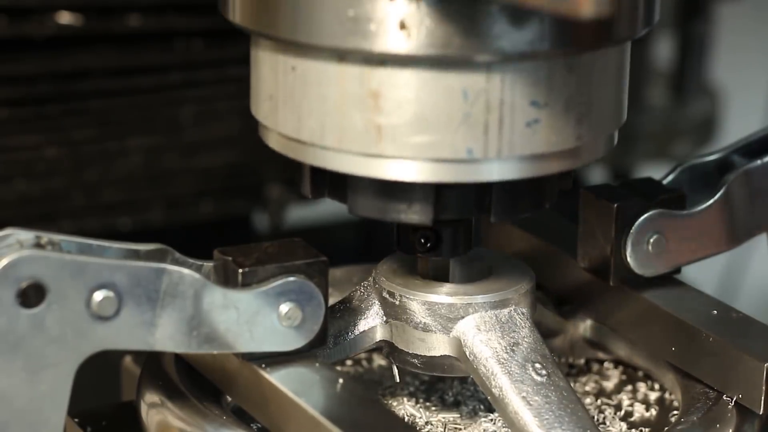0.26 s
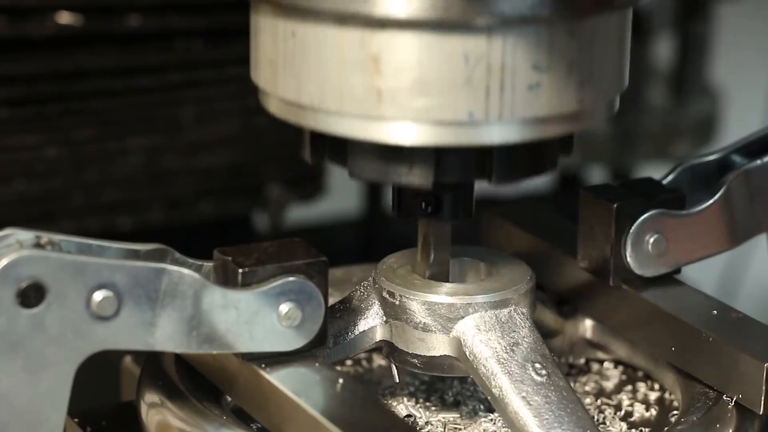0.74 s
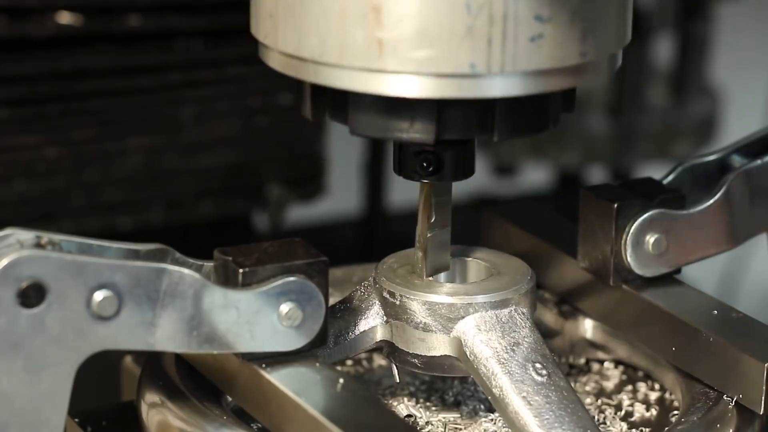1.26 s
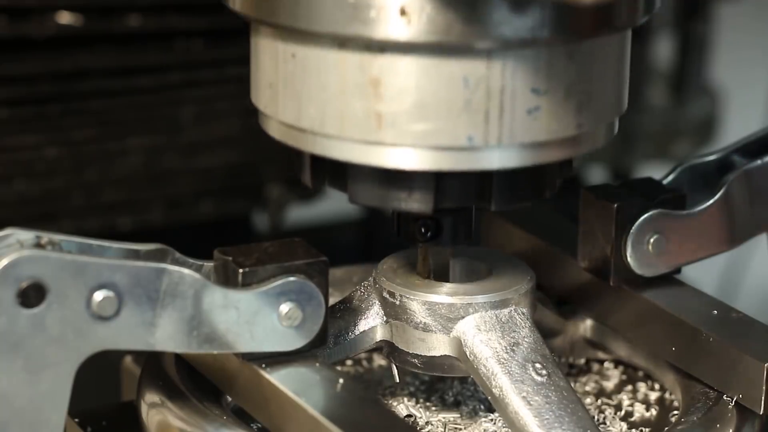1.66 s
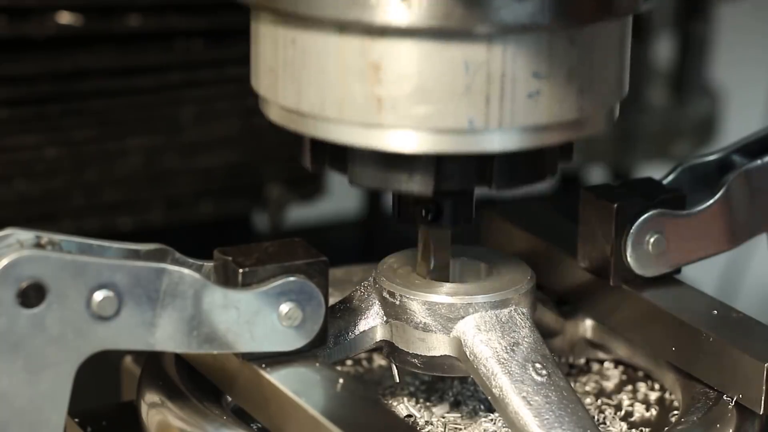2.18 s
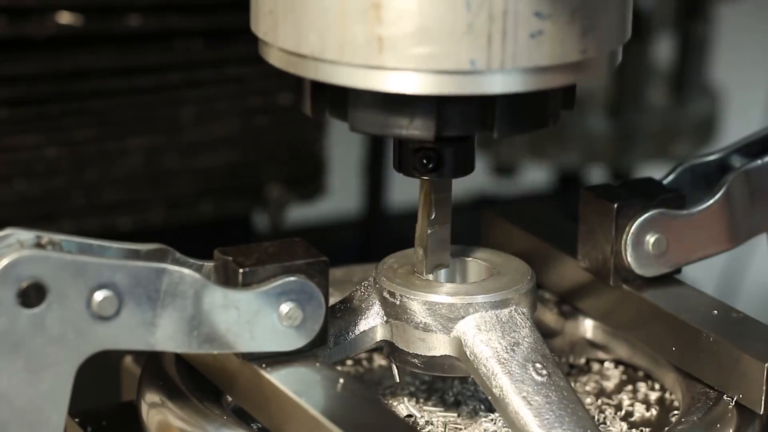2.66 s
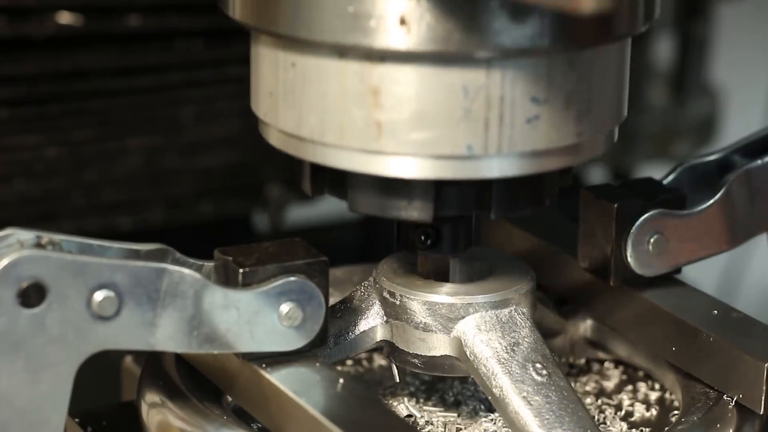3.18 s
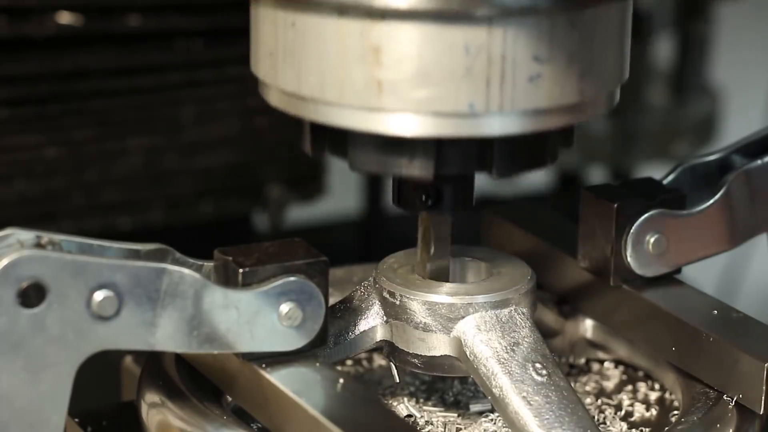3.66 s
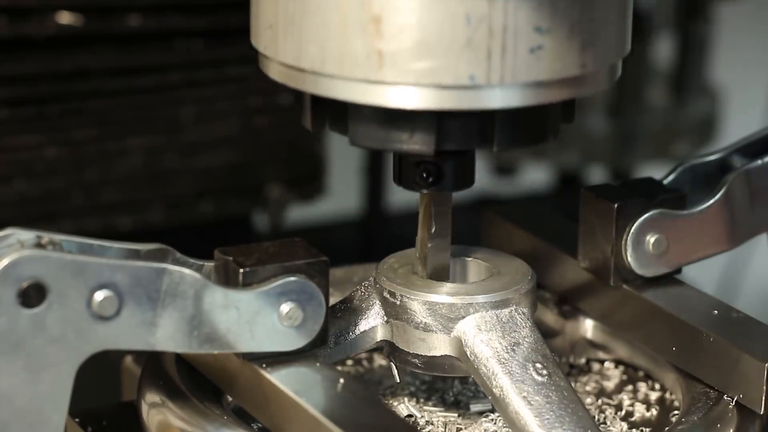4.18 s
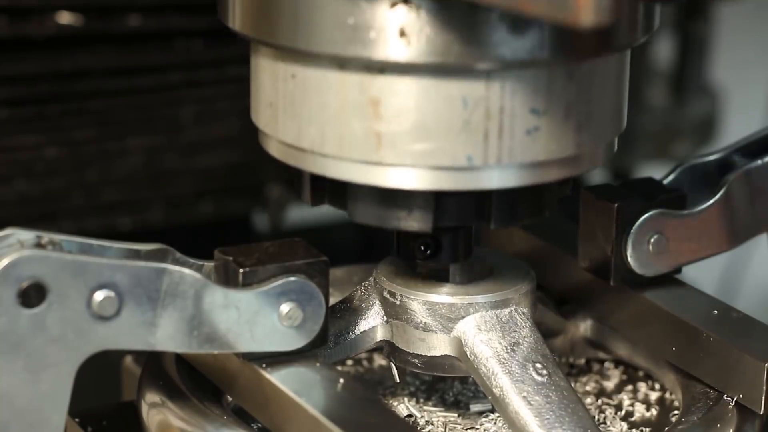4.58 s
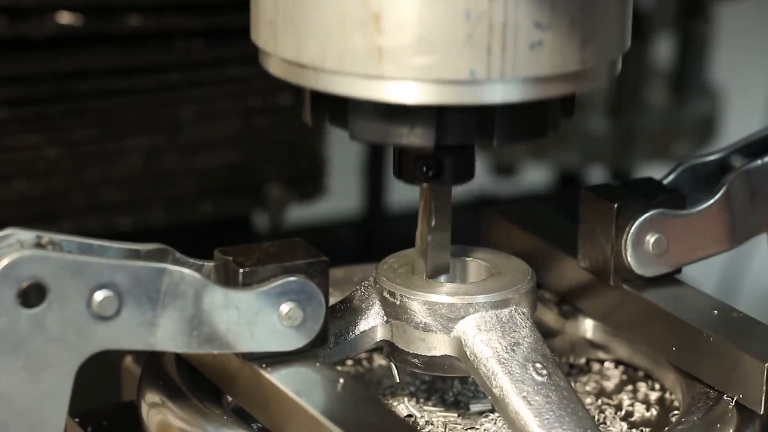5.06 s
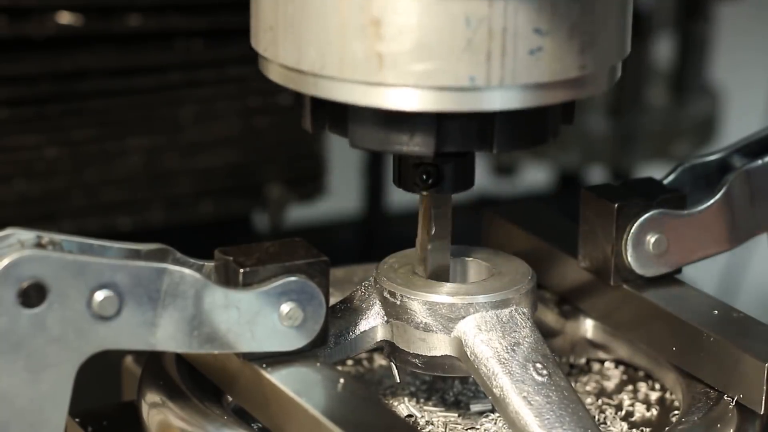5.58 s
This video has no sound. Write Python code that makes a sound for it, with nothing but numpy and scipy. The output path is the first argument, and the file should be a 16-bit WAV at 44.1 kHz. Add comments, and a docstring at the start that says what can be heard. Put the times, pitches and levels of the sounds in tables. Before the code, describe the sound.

A milling machine's ram is worked up and down with no motor running, shaving a steel bore about every second and a half. Each stroke starts with a gear clack, then a soft, gritty scrape with tiny chips snapping off. A sharp metal clack marks the bottom, and a booming thump ends the return. The machine is close and straight ahead in a small, quiet workshop.

```python
"""Slotting a keyway

A milling machine's quill is worked up and down, spindle still, so that a tool shaves a steel bore.
On each stroke friction excites the tool's resonances and chips snap off; the quill hits its lower
stop, slides back and thumps into its upper stop. The feed gear clacks into mesh as the next stroke
starts. Each impact sets the modes of the cast frame booming, and a small workshop reverberates."""
import sys
import numpy as np
from scipy import signal
from scipy.fft import rfft, irfft, next_fast_len
from scipy.io import wavfile
from scipy.ndimage import map_coordinates

SR = 44100
rng = np.random.default_rng(int(sys.argv[2]) if len(sys.argv) > 2 else 0)


def transcribe(u):
    """Save the signal u as a 16-bit wav file named by the first command-line argument.

    u: samples, shape (n,) or (channels, n), limited to [-1, 1]; the rate is SR.
    q: integer samples, one column per channel.
    """
    v = np.clip(np.atleast_2d(u).T, -1, 1)
    q = np.round(v * 32767).astype(np.int16)
    wavfile.write(sys.argv[1], SR, q)


N = 257087
AGE = np.arange(SR // 2) / SR  # seconds since a blow

# Quill strokes: start_s, deepest_bite_s, scrape_db, swell_db_per_s, return_rub_db
STROKES = [(-0.113, 0.075, -49, 84, -59.5), (1.362, 1.624, -49.5, 60, -61), (2.799, 3.115, -49, 74, -60.5),
           (4.121, 4.393, -47, 122, -60.5), (5.519, 5.857, -48.5, 93, -58.5)]
# Resonances of the tool, sliding quill and column under the rack: centre_hz, width_hz, level_db
TOOL_PEAKS = [(750, 380, -6.5), (1444, 72, -2), (1950, 270, -10.5), (3785, 520, -5.5), (4200, 52, 6.5),
              (5206, 275, -4), (5560, 160, -4.5), (6037, 78, 8.5), (6970, 320, -11), (7590, 190, -1.5),
              (8445, 150, 0.5), (8900, 240, -9.5)]
QUILL_PEAKS = [(4095, 70, -9.5), (5990, 85, -1.5), (6870, 34, -18.5), (8560, 98, -5), (5830, 4800, -22.5)]
RUMBLE_PEAKS = [(36, 7.1, -21.5), (106, 18, 2), (144, 15, -9), (183, 17, 1.5), (223, 24, -9),
                (203.6, 200, -19)]
# Chips breaking off: snap_s, level_db, pitch_hz, tool_ring_db, tear_s
CHIPS = [(0.4322, -41.5, 11900, -47, 0.008), (1.8263, -36.5, 14060, -59.5, 0.024),
         (2.454, -41, 13500, -38, 0.0088), (3.267, -43.5, 11700, -48, 0.046),
         (4.4166, -36, 12900, -36.5, 0.032), (4.6337, -40, 13600, -44, 0.011),
         (5.816, -33, 13300, -40.5, 0.016)]
# Modes of a chip: pitch_ratio, level_db
CHIP_MODES = [(0.77, -11.5), (0.88, -9), (1, 7), (1.08, -8)]
# Blows on each stop: start_s, clack_db, thud_db, boom_db, boom_hz, treble_db_per_octave
LOWER_BLOWS = [(0.572, -5.5, -26, -30, 357, 4.5), (2.056, -10, -26.5, -30, 259, -3),
               (3.479, -9, -25, -24, 225, -3), (4.803, -24, -24, -27, 246, -8),
               (4.811, -20.5, -41, -37, 266, -4), (4.84, -29, -35, -20, 367, 3.5)]
UPPER_BLOWS = [(0.991, -19, -25.5, -23, 343, -1), (2.454, -19.5, -23, -26, 365, -9),
               (3.883, -17, -23.5, -19.5, 331, -1), (5.176, -30.5, -29, -32, 279, 13),
               (5.187, -9, -29, -29, 282, -1)]
# Feed gear engaging: start_s, clack_db, thud_db, treble_db_per_octave, touch_db
GEAR_CLACKS = [(1.355, -12.5, -21.5, 3.5, -38), (2.807, -12.5, -22, 2.5, -41),
               (4.12, -18.5, -30.5, -2, -47), (5.503, -18, -25.5, -2, -43)]
# Knocks of play in the drive: start_s, clack_db, thud_db, boom_db
DRIVE_KNOCKS = [(0.763, -52, -33, -42.5), (1.153, -34, -51, -40), (2.199, -52, -36.5, -46.5),
                (2.676, -42, -44, -43.5), (4.023, -28, -68, -34.5), (4.046, -32, -32.5, -44),
                (5.395, -40, -36.5, -47)]
# Spectra of the three contacts, the frame's dense ring and the quiet shop: frequency_hz, density_db
LOWER_SPECTRUM = [(180, -17.5), (300, 5), (486, -5.5), (2320, -2), (3030, 4.5), (3520, -1.5), (4090, -1),
                  (6300, -11.5), (9090, -25), (16000, -83)]
UPPER_SPECTRUM = [(180, -13), (300, 2.5), (645, -8.5), (2880, -9), (3580, -9.5), (4160, -6), (4750, -10.5),
                  (5340, -11), (8640, -25.5), (9880, -45), (13500, -48), (16000, -60)]
GEAR_SPECTRUM = [(180, -26), (300, -12), (584, -4.5), (1060, 1), (1360, -3), (3030, -0.5), (4670, -11.5),
                 (6000, -12), (6620, -25), (16000, -70)]
FRAME_SPECTRUM = [(25, -29.5), (65, -16), (100, 2.5), (440, -3), (560, -20), (1000, -57)]
SHOP_SPECTRUM = [(20, 0), (300, 10), (1000, 0), (3000, -3), (8000, -5.5), (10000, -9), (16000, -10)]
# Modes of the column, head and steel fittings: frequency_hz, level_db, t60_s
COLUMN_MODES = [(38.4, -24, 1), (101.6, -4.5, 0.33), (141.8, -13.5, 0.59), (186.76, 3.5, 0.24),
                (223.7, -1.5, 0.16)]
HEAD_MODES = [(258.1, -5.5, 0.21), (275.4, -0.5, 0.14), (310.3, -10, 0.35), (355, 4, 0.17),
              (413, -6.5, 0.24), (438.3, -5, 0.28), (468.4, -24.5, 0.11)]
FITTING_MODES = [(635, -10, 0.61), (690, 1, 0.1), (946, 0, 0.21), (1126, 4.5, 0.19), (1477, -7, 0.37),
                 (1550, 1.5, 0.12), (1815, 3.5, 0.057), (2120, -6, 0.088), (2570, -7.5, 0.079),
                 (2680, -1.5, 0.21), (3060, -0.5, 0.158), (3340, -23, 0.43), (4030, 1, 0.056)]
# Workshop reverberation: frequency_hz, t60_s
ROOM_T60 = [(200, 0.4), (1500, 0.25), (4000, 0.23), (12000, 0.27)]
# Edge catching on the bore: start_s, level_db
EDGE_CATCHES = [(1.2992, -46), (2.9113, -47), (3.369, -45.5), (4.05, -49), (5.432, -43)]
# Loose fittings: start_s, level_db, pitch_hz
CLINKS = [(0.751, -31.5, 1110), (1.1518, -35, 4140), (1.705, -37.5, 1400), (2.1834, -33.5, 1090),
          (2.5187, -28.5, 1360), (4.0262, -35, 1730)]

DOWN_S, UP_S = 0.685, 0.42  # travel time from stop to stop
BITE_HOLD_S, RELEASE_DB_PER_S = 0.084, 121
TEAR_DB, TEAR_GRAIN_DB, CHIP_WIDTH_HZ = -19, 8, 670
LIFT_DELAY_S, LIFT_DB = 0.098, -44.5  # the edge leaves the slot after the lower stop
TOUCH_LEAD_S, TOUCH_THUD_DB, TOUCH_DB_PER_OCTAVE = 0.025, -33, 13
GEAR_BOOM_DB, GEAR_BOOM_HZ = -37.5, 293
KNOCK_BOOM_HZ, KNOCK_DB_PER_OCTAVE = 365, -2
TOP_HZ = 15800


def amp(db):
    """Decibels to amplitude ratio."""
    return 10 ** (np.asarray(db) / 20)


def unit(x):
    """Normalisation to rms 1."""
    return x / np.sqrt(np.mean(x ** 2) + 1e-20)


def along(points, hz):
    """Interpolation on a logarithmic frequency axis."""
    frequencies, values = np.transpose(points)
    return np.interp(np.log(hz + 1), np.log(frequencies + 1), values)


def wobble(rate_hz):
    """Smooth random modulation: a spline through rate_hz knots a second."""
    return map_coordinates(rng.standard_normal(N // 20), [np.arange(N) * rate_hz / SR], mode="wrap")


def filtered(x, response):
    """Linear filtering: the spectrum is multiplied by response(hz)."""
    n = x.shape[-1]
    padded = next_fast_len(n + SR // 8)
    return irfft(rfft(x, padded) * response(np.fft.rfftfreq(padded, 1 / SR)), padded)[..., :n]


def noise(gain_db, size):
    """Coloured noise of rms 1 with the spectrum gain_db(hz)."""
    return unit(filtered(rng.standard_normal(size), lambda hz: amp(gain_db(hz))))


def resonate(x, peaks):
    """Forced response of Lorentzian resonances, scaled to rms 1."""
    def response(hz):
        return sum(amp(db) / (1 + (2 * (hz - centre) / width) ** 2) for centre, width, db in peaks)
    return unit(filtered(x, response))


def fade(rise_s, t60_s):
    """Damped vibration: a quick rise, then exponential decay."""
    return (1 - np.exp(-AGE / rise_s)) * amp(-60 * AGE / t60_s)


def ping(pitch_hz, width_hz):
    """One noise-driven resonance: the unsteady ring of a small piece of steel."""
    return resonate(rng.standard_normal(len(AGE)), [(pitch_hz, width_hz, 0)])


def add(track, start_s, sound):
    """Superposition of a sound on the track."""
    start = max(round(start_s * SR), 0)
    part = sound[..., :N - start]
    track[..., start:start + part.shape[-1]] += part


def travel(start_s, length_s, fullness, lean=1):
    """Speed, 0-1, of the quill accelerating and slowing between stops; a lean under 1 peaks early."""
    progress = np.clip((np.arange(N) / SR - start_s) / length_s, 0, 1) ** lean
    return (4 * progress * (1 - progress)) ** fullness


def friction(peaks, grain_db, judder_db):
    """Stick-slip friction: tiny slips of steel on steel excite resonances."""
    slips = rng.standard_normal(N) * amp(grain_db * wobble(820))
    return resonate(slips, peaks) * amp(judder_db * wobble(50))


def shop_air():
    """Ambient noise: the workshop's faint hiss is only partly correlated between the ears."""
    mid, side = noise(lambda hz: along(SHOP_SPECTRUM, hz), (2, N))
    side = filtered(side, lambda hz: amp(along([(30, 14), (200, -10), (2000, -2.5), (12000, 1.5)], hz)))
    return amp(-64) * np.array([mid + side, mid - side])


def tool_scrape():
    """Friction drives the tool as pressure swells with the bite, holds, and is released."""
    t = np.arange(N) / SR
    pressure = np.zeros(N)
    for _, bite_s, db, swell_db_per_s, _ in STROKES:
        approach_db = swell_db_per_s * np.maximum(bite_s - t, 0)
        release_db = RELEASE_DB_PER_S * np.maximum(t - bite_s - BITE_HOLD_S, 0)
        pressure += amp(db - approach_db - release_db)
    return pressure * friction(TOOL_PEAKS, grain_db=1.5, judder_db=0.3)


def quill_slide():
    """Sliding friction grows with speed: faint going down, stronger on the return."""
    rub = np.zeros(N)
    for start_s, *_, return_db in STROKES:
        rub += amp(-67) * travel(start_s, DOWN_S, fullness=1.2)
        rub += amp(return_db) * travel(start_s + DOWN_S, UP_S, fullness=0.9, lean=0.62)
    return amp(0.5) * rub * friction(QUILL_PEAKS, grain_db=1, judder_db=0.76)


def rack_rumble():
    """Forced vibration: the rolling pinion shakes the column, most under load on the way down."""
    load = np.zeros(N)
    for start_s, *_ in STROKES:
        load += amp(-50) * travel(start_s, DOWN_S, fullness=0.43)
        load += amp(-64) * travel(start_s + DOWN_S, UP_S, fullness=0.6)
    return load * amp(0.5 * wobble(11)) * resonate(rng.standard_normal(N), RUMBLE_PEAKS)


def chips():
    """Fracture: each chip crackles as it tears, snaps off with a squeak and flicks the tool."""
    out = np.zeros(N)
    middle_s = AGE.mean()
    for snap_s, db, pitch_hz, tool_db, tear_s in CHIPS:
        peaks = [(pitch_hz * ratio, CHIP_WIDTH_HZ, mode_db) for ratio, mode_db in CHIP_MODES]
        cracks = rng.standard_normal((2, len(AGE)))
        cracks *= amp(TEAR_GRAIN_DB * np.clip(wobble(420)[:len(AGE)], -2, 1.5))
        tear, squeak = resonate(cracks, peaks)
        tear *= np.exp(-np.abs(AGE - middle_s) / tear_s)  # loudest at the snap
        squeak *= amp(-0.5) * fade(0.002, 0.025)
        snap = amp(-12.5) * ping(12500, width_hz=6000) * fade(0.0005, 0.03)
        add(out, snap_s - middle_s, amp(db + TEAR_DB) * tear)
        add(out, snap_s, amp(db) * (squeak + snap) + amp(tool_db) * tool_flick())
    return out


def tool_flick():
    """Elastic release: the tool rings briefly when its edge springs free."""
    peaks = TOOL_PEAKS + [(4000, 37000, -21)]  # plus a broadband floor
    return amp(-5.5) * resonate(rng.standard_normal(len(AGE)), peaks) * fade(0.00017, 0.1)


def contact_noise(spectrum, treble_db_per_octave):
    """Broadband excitation, four independent signals: each blow has its own treble tilt, dull to bright."""
    def gain_db(hz):
        octaves = np.clip(np.log2((hz + 1) / 2800), 0, 2)
        # the spectrum is lifted around the modes of the fittings
        peaks = sum(amp(db) / (1 + (2 * (hz - centre) / 98) ** 2) for centre, db, _ in FITTING_MODES)
        lift_db = 6 * (peaks - 0.067 * (hz < 4500))
        return along(spectrum, hz) + treble_db_per_octave * octaves + lift_db
    return noise(gain_db, (4, len(AGE)))


def ring(modes, rise_s, centre_hz, focus_db, scatter_db):
    """Free vibration: damped modes of random strength, weaker by focus_db per octave off centre."""
    out = np.zeros(len(AGE))
    for hz, db, t60_s in modes:
        strength, phase = rng.standard_normal(2)
        gain = amp(db + scatter_db * strength - focus_db * abs(np.log2(hz / centre_hz)))
        out += gain * fade(rise_s, t60_s) * np.sin(2 * np.pi * (hz * AGE + phase))
    return out


def reverberation(diffuse):
    """Absorption: the walls soak up treble, and each band of the diffuse field decays at its own rate."""
    dulled = filtered(np.array(diffuse), lambda hz: amp(-np.minimum(hz / 1500, 4)))
    hz, t, bands = signal.stft(dulled, SR, nperseg=256)
    bands *= amp(-60 * t / along(ROOM_T60, hz)[:, None])
    mid, side = signal.istft(bands, SR, nperseg=256)[1][..., :len(AGE)]
    return (mid + amp(-22.5) * np.array([side, -side])) * (1 - np.exp(-AGE / 0.01))


def impacts(blows, spectrum, rise_s, crack_t60_s, crack_db, rub_db, ring_db, ring_hz, rattle_db,
            room_db, column_db, column_focus_db, head_db, frame_db):
    """Impact excitation: steel meets steel with a crack that rings the fittings, frame and room."""
    out = np.zeros((2, N))
    for start_s, clack_db, thud_db, boom_db, boom_hz, treble in blows:
        rub, clash, *diffuse = contact_noise(spectrum, treble)
        # the faces rub as they close, then chatter for a few milliseconds
        add(out, start_s - len(AGE) / SR, amp(clack_db + rub_db) * rub * amp(-60 * AGE[::-1] / 0.07))
        chatter = unit(amp(2.1 * wobble(1100)[:len(AGE)]))
        envelope = fade(rise_s, crack_t60_s) * (1 - np.exp(-AGE / rise_s))
        crack = amp(crack_db) * clash * chatter * envelope
        steel = amp(ring_db) * ring(FITTING_MODES, 0.00087, ring_hz, focus_db=7, scatter_db=5.5)
        # loose parts near the point of impact keep buzzing
        rattle = amp(rattle_db) * ping(ring_hz, width_hz=400) * fade(0.0018, 0.29)
        rattle *= amp(1.7 * wobble(63)[:len(AGE)])
        column = ring(COLUMN_MODES, 0.027, centre_hz=185, focus_db=column_focus_db, scatter_db=-2.6)
        head = ring(HEAD_MODES, 0.012, boom_hz, focus_db=17.5, scatter_db=3.5)
        frame = noise(lambda hz: along(FRAME_SPECTRUM, hz), len(AGE)) * fade(0.014, 0.3)
        body = amp(thud_db + column_db) * column + amp(boom_db + head_db) * head
        body += amp((thud_db + boom_db) / 2 + frame_db) * frame
        room = amp(room_db) * reverberation(diffuse)
        add(out, start_s, amp(clack_db) * (crack + steel + rattle + room) + body)
    return out


def lower_stop():
    """Impact ends the downstroke with a bright clack."""
    return impacts(LOWER_BLOWS, LOWER_SPECTRUM, rise_s=0.0022, crack_t60_s=0.038, crack_db=1.5,
                   rub_db=-40.5, ring_db=-26.5, ring_hz=1756, rattle_db=-34.5, room_db=-15,
                   column_db=4.5, column_focus_db=1, head_db=-1, frame_db=1)


def edge_ticks():
    """Transients ring the tool when its edge catches on the bore or lifts out of the slot."""
    out = np.zeros(N)
    lifts = [(start_s + DOWN_S + LIFT_DELAY_S, LIFT_DB) for start_s, *_ in STROKES]
    for start_s, db in EDGE_CATCHES + lifts:
        if start_s * SR < N:
            tick = tool_flick() + amp(-20) * ping(12000, width_hz=5000) * fade(0.00093, 0.04)
            add(out, start_s, amp(db) * tick)
    return out


def fitting_clinks():
    """Damped resonance: loose fittings jump and ring for a moment."""
    out = np.zeros(N)
    for start_s, db, pitch_hz in CLINKS:
        add(out, start_s, amp(db - 14) * ping(pitch_hz, width_hz=260) * fade(0.0011, 0.15))
    return out


def feed_gear():
    """Backlash: the teeth touch lightly, then clack into mesh; the drive knocks between cuts."""
    touches = [(s - TOUCH_LEAD_S, db, TOUCH_THUD_DB, GEAR_BOOM_DB, GEAR_BOOM_HZ, TOUCH_DB_PER_OCTAVE)
               for s, *_, db in GEAR_CLACKS]
    clacks = [(s, clack_db, thud_db, GEAR_BOOM_DB, GEAR_BOOM_HZ, treble)
              for s, clack_db, thud_db, treble, _ in GEAR_CLACKS]
    knocks = [(*knock, KNOCK_BOOM_HZ, KNOCK_DB_PER_OCTAVE) for knock in DRIVE_KNOCKS]
    return impacts(touches + clacks + knocks, GEAR_SPECTRUM, rise_s=0.0014, crack_t60_s=0.046,
                   crack_db=-1.5, rub_db=-33.5, ring_db=-21.5, ring_hz=2660, rattle_db=-27.5,
                   room_db=-17, column_db=3.5, column_focus_db=6, head_db=0, frame_db=0.5)


def upper_stop():
    """Impact ends the return with a thump, strong in the modes of the head."""
    return impacts(UPPER_BLOWS, UPPER_SPECTRUM, rise_s=0.001, crack_t60_s=0.032, crack_db=1,
                   rub_db=-24.5, ring_db=-23.5, ring_hz=1400, rattle_db=-27, room_db=-16.5,
                   column_db=5, column_focus_db=2.5, head_db=4.5, frame_db=-0.5)


def scene():
    """Superposition: the machine is close and straight ahead, its direct sound alike at both ears."""
    motion = tool_scrape() + quill_slide() + rack_rumble()
    blows = lower_stop() + upper_stop() + feed_gear()
    return motion + blows + fitting_clinks() + chips() + edge_ticks() + shop_air()


def record(dry):
    """Band limiting: an ideal low-pass filter removes everything above TOP_HZ."""
    return filtered(dry, lambda hz: hz < TOP_HZ)


dry = scene()
out = record(dry)
transcribe(out)
```